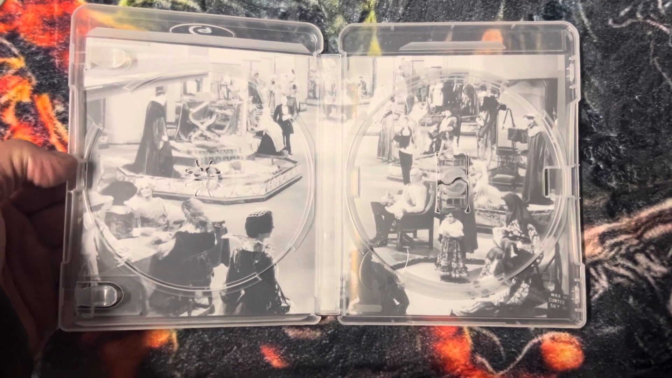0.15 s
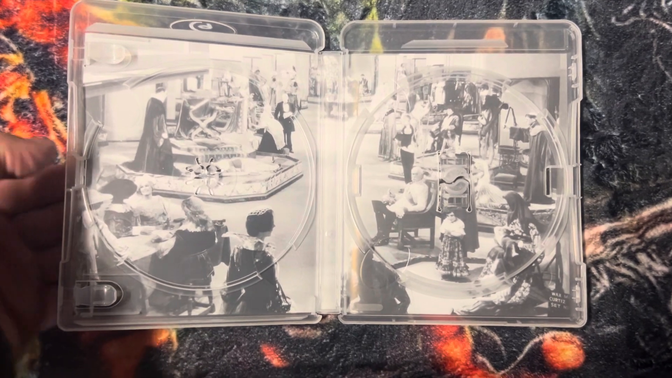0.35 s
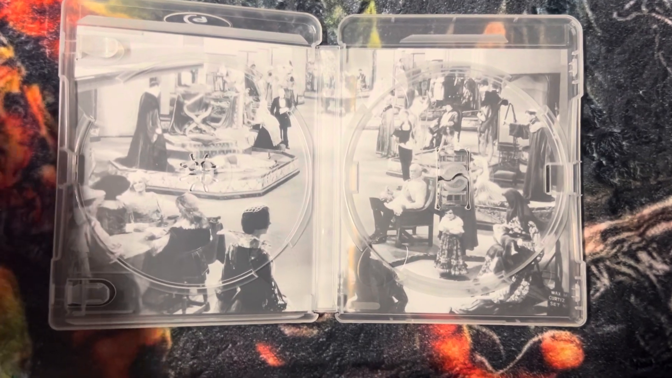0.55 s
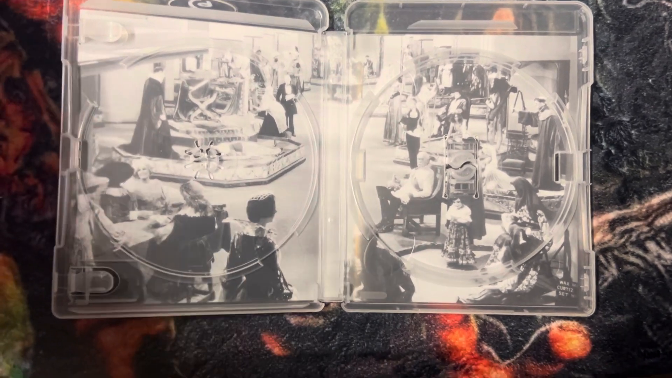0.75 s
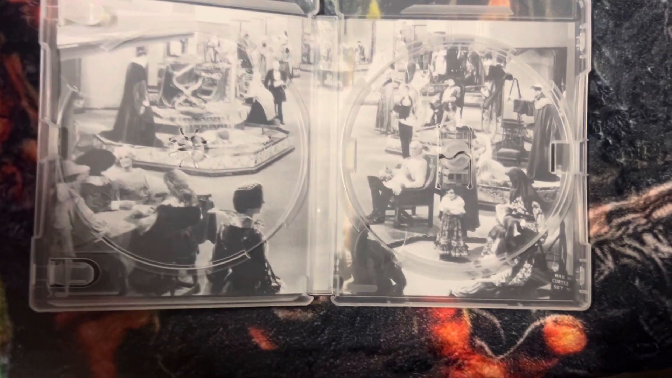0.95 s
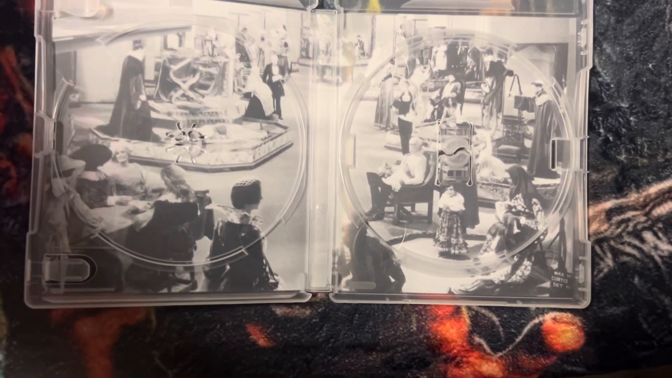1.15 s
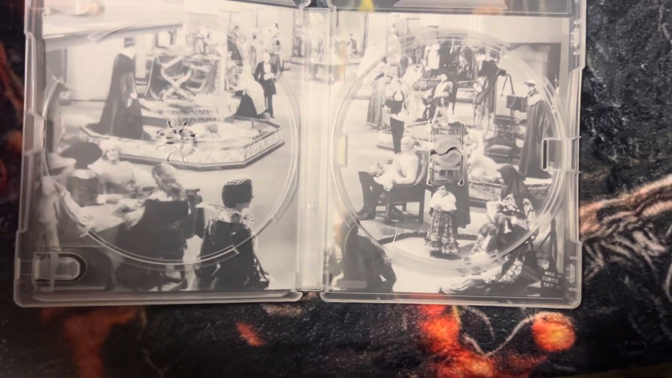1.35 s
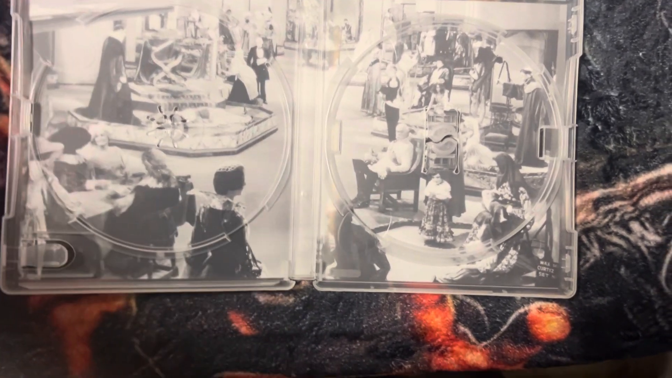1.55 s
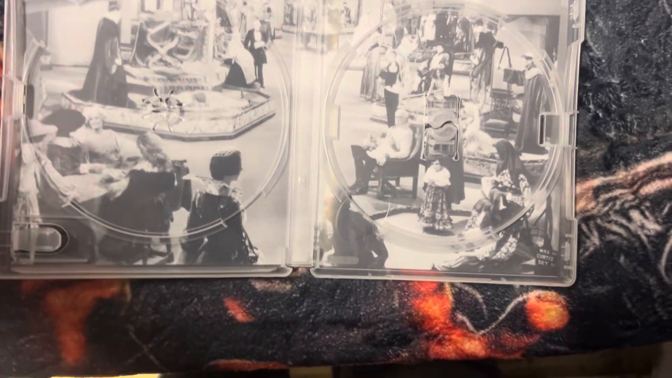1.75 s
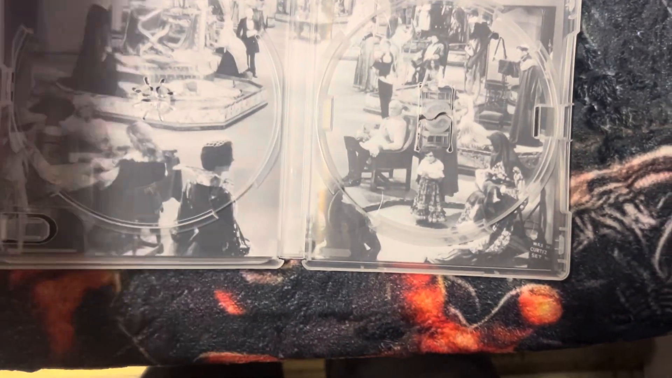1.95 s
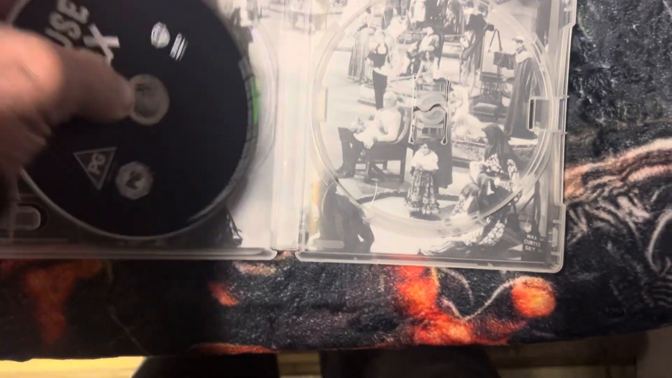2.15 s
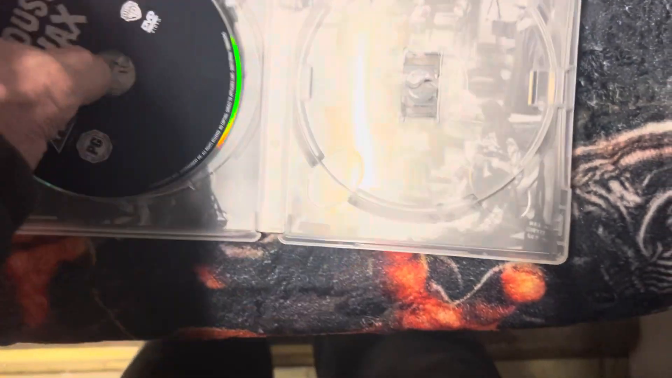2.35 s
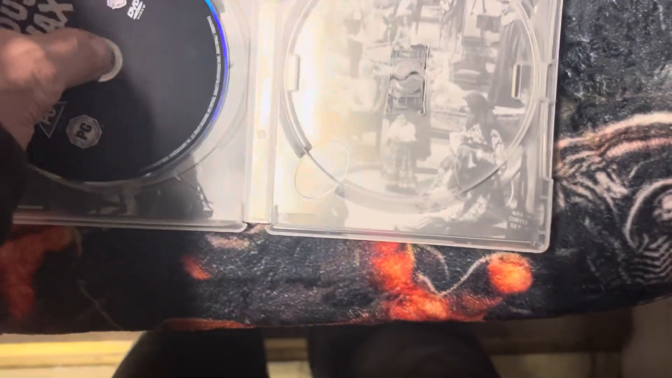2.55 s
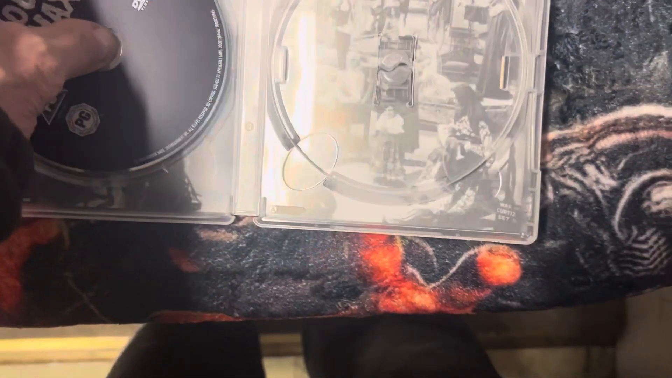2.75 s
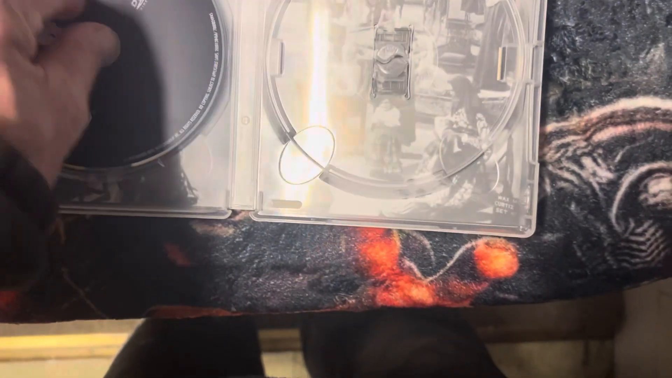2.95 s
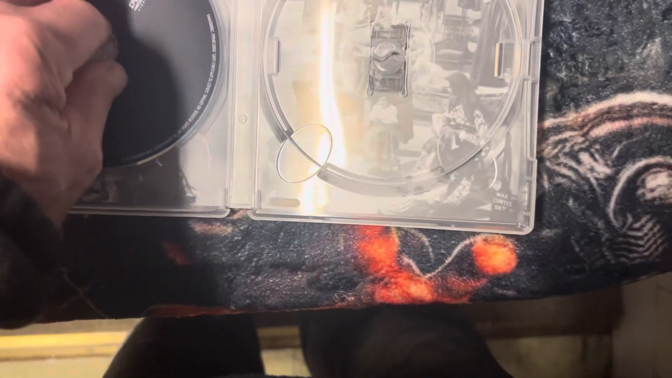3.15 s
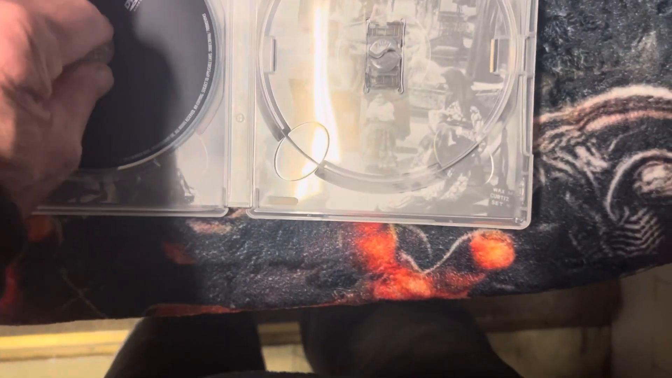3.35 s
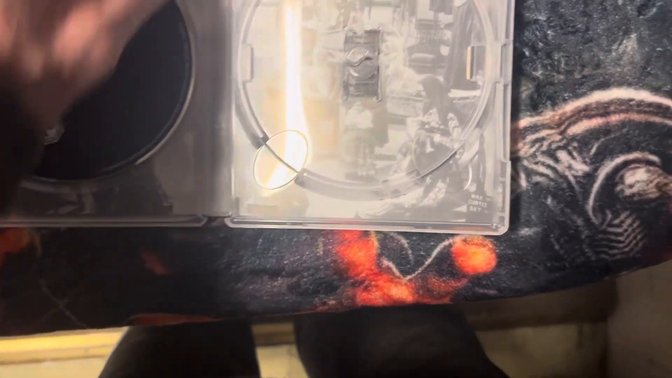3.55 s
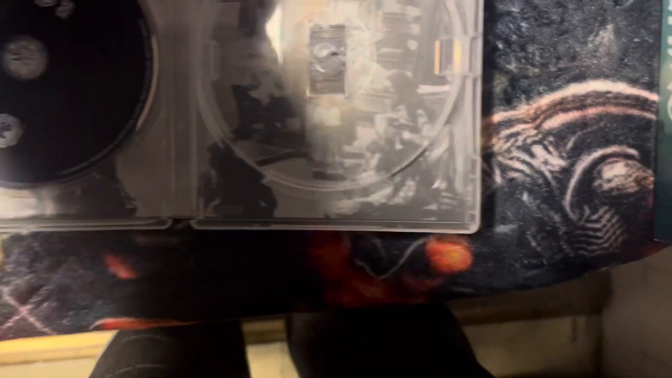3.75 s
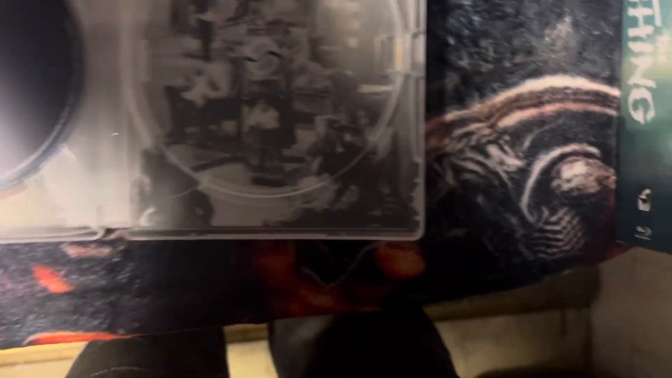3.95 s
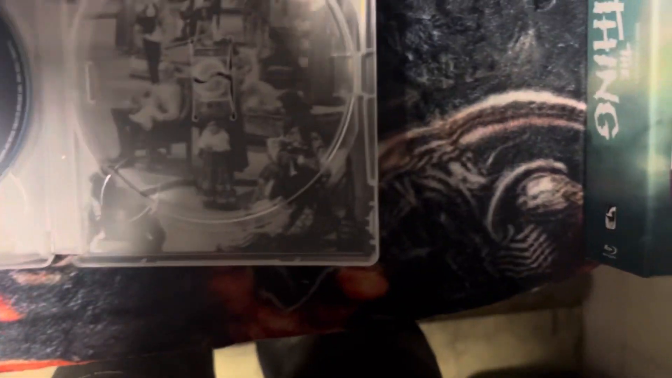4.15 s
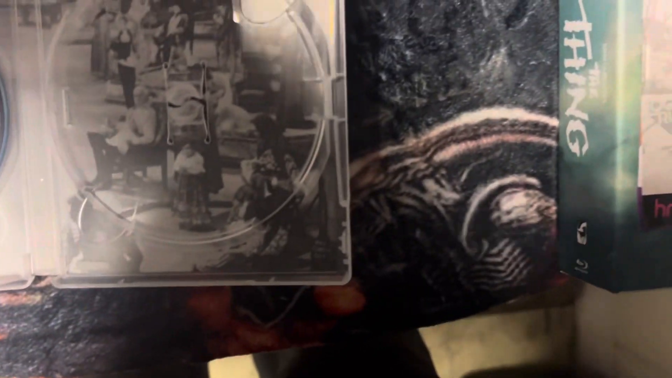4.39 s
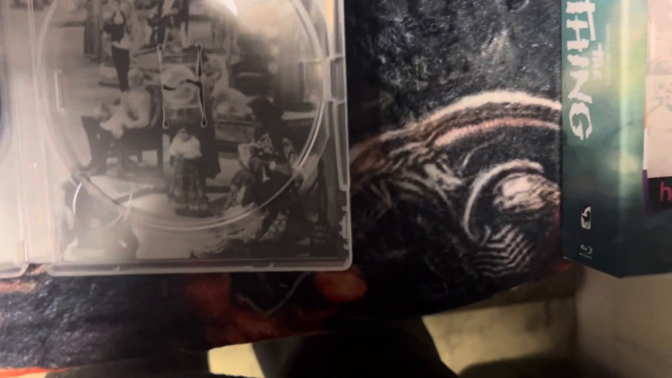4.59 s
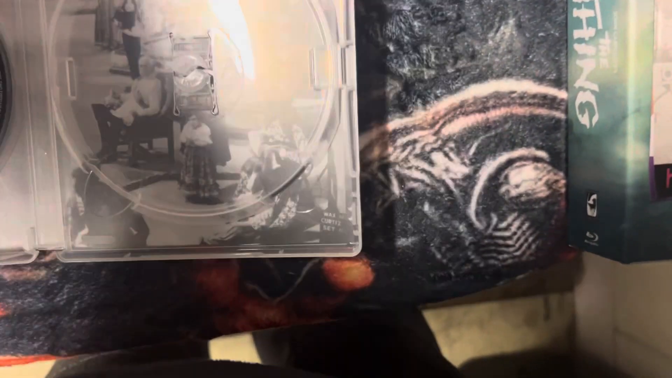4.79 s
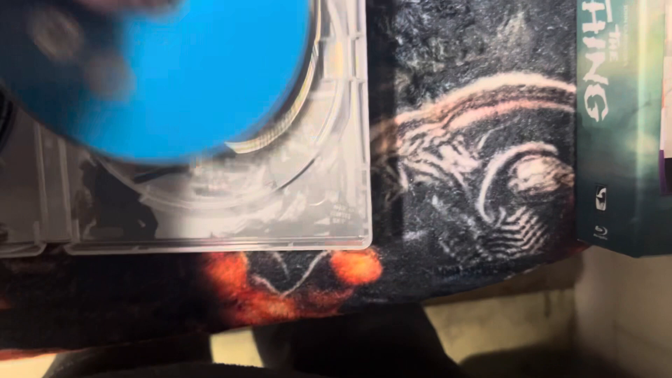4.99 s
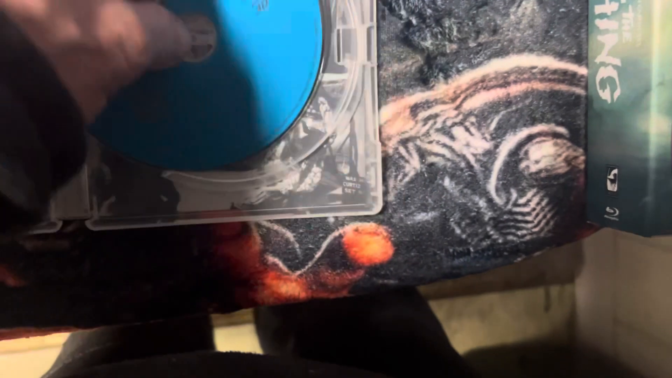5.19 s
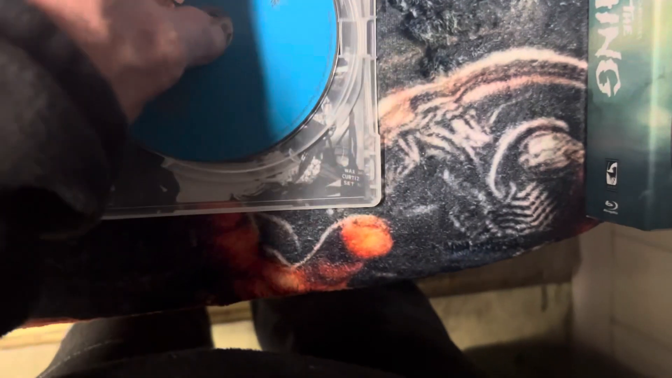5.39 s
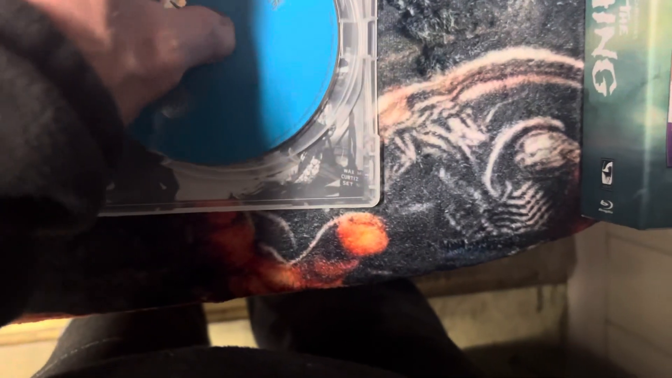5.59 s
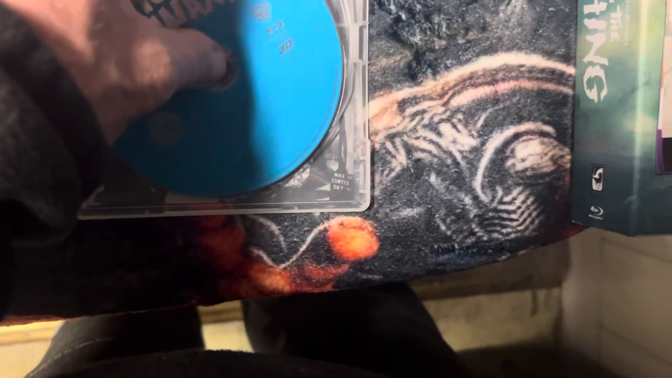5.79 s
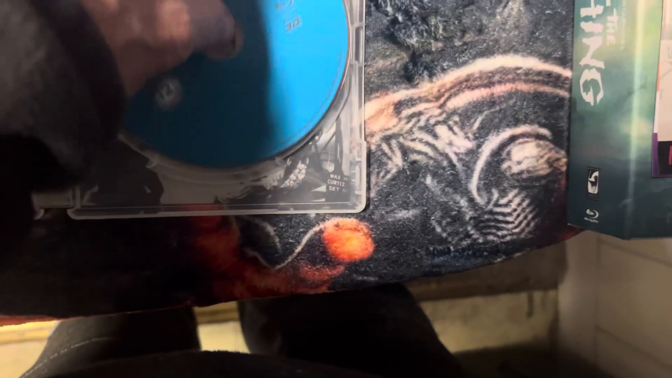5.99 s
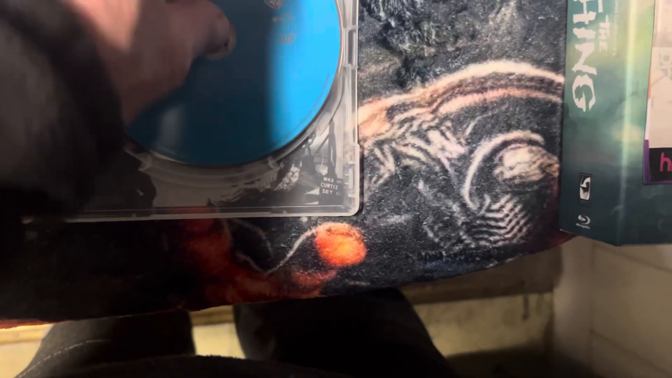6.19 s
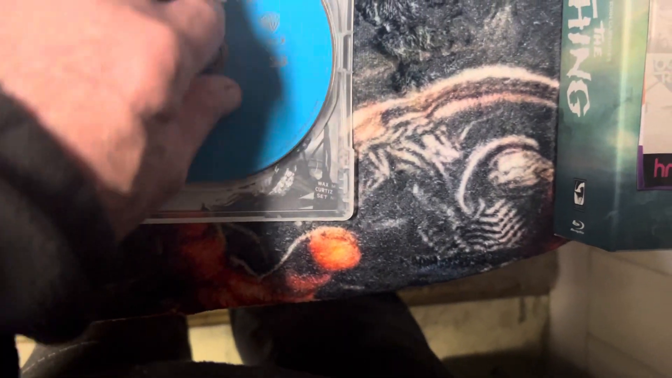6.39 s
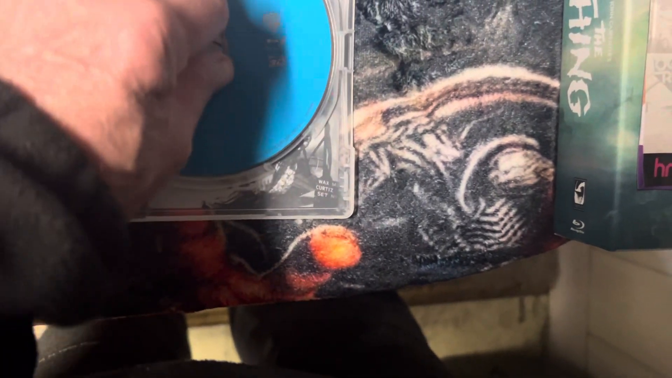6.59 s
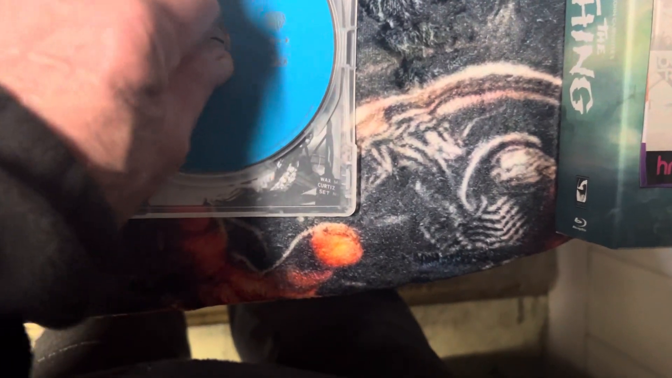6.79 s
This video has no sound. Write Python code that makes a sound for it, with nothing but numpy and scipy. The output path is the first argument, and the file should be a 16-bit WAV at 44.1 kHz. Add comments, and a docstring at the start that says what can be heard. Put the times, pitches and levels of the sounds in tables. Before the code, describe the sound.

Close handling of a hollow plastic disc case on a blanket in a small quiet room. Faint rubbing and tiny ticks come first, then a loud double clack as a disc lands, lighter rattles and a bright snap. After a quiet pause a second disc clatters down, is shifted and tapped, and finally snaps home loudest of all. Hand-held phone, near and dry.

```python
"""Two discs are laid on the hubs of an open plastic case on a blanket, shifted about, pressed until they snap home.
Each contact is a few ms of grainy force ringing tray, disc and rim; scrapes are longer, swelling forces.
Pushes thud as low decaying sines; skin and sleeve rubbing, and the rattle after hard contacts, are swells of noise.
Behind: a faint wall tail, air noise and lumpy rumble. A hand-held phone with two microphone ports listens close by."""
import sys
import numpy as np
from scipy import signal
from scipy.fft import rfft, irfft, next_fast_len
from scipy.io import wavfile
from scipy.ndimage import uniform_filter1d

SR = 44100
rng = np.random.default_rng(int(sys.argv[2]) if len(sys.argv) > 2 else 0)


def dump(signal):
    """Clip the signal to [-1, 1] and save it as 16-bit WAV at the path in sys.argv[1]."""
    limited = np.clip(np.atleast_2d(signal).T, -1, 1)
    pcm = np.round(limited * 32767).astype(np.int16)
    wavfile.write(sys.argv[1], SR, pcm)


def volts(x):
    """Linear amplitude factor 10**(x/20) for a level x in dB, scalar or array-like."""
    e = np.asarray(x, float) / 20
    return 10 ** e


N = 301369  # samples


def unit(x):
    """Scaled to rms 1."""
    return x / np.sqrt(np.mean(x ** 2) + 1e-20)


def along(points, hz, column=1):
    """One column of a table read on a log frequency axis."""
    rows = np.transpose(points)
    return np.interp(np.log(hz + 1), np.log(rows[0] + 1), rows[column])


def over_time(points):
    """Second column of a (time, value) table, one value per sample."""
    time_s, value = np.transpose(points)
    return np.interp(np.arange(N) / SR, time_s, value)


def wobble(knots_per_s):
    """Random curve, straight between normally distributed knots."""
    knots = rng.standard_normal(int(N * knots_per_s / SR) + 2)
    return np.interp(np.arange(N) * knots_per_s / SR, np.arange(len(knots)), knots)


def filtered(x, response):
    """x times a complex response of frequency."""
    size = next_fast_len(N + 8192)
    hz = np.fft.rfftfreq(size, 1 / SR)
    return irfft(rfft(x, size) * response(hz), size)[..., :N]


def ringing(x, modes, spread_db=0, near_hz=None):
    """x through parallel resonances, spread_db random in strength; those near near_hz, if given, ring most."""
    mode_hz, width_hz, level_db = np.transpose(modes)[:, :, None]
    level_db = level_db + spread_db * rng.standard_normal(mode_hz.shape)
    if near_hz:
        level_db = level_db - 11 * np.log2(mode_hz / near_hz) ** 2
    sign = (-1.) ** np.arange(len(modes))[:, None]
    size = next_fast_len(x.shape[-1] + 1024)
    f = np.fft.rfftfreq(size, 1 / SR)

    def resonance(width):
        return 1j * f * width / (mode_hz ** 2 - f ** 2 + 1j * f * width)

    # a weaker, narrower part of each mode lingers
    response = resonance(width_hz) + 0.25 * resonance(0.2 * width_hz)
    total = (sign * volts(level_db) * response).sum(0)
    return irfft(rfft(x, size) * total, size)[..., :x.shape[-1]]


# likeness of diffuse sound at the two ports: (frequency [Hz], likeness [0-1])
PORT_LIKENESS = [(60, 1), (300, .75), (900, 0.2), (1600, 0.05), (2400, 0.8), (3700, 0.03), (4600, 0.99),
                 (5500, 0), (6600, .95), (16000, .95)]


def diffuse(spectrum):
    """Two-port noise of rms 1; the mid/side balance sets how alike the ports are."""
    def mid_side(hz):
        angle = np.arccos(np.clip(along(PORT_LIKENESS, hz), 0, 1)) / 2
        return volts(along(spectrum, hz)) * np.array([np.cos(angle), np.sin(angle)])

    mid, side = filtered(rng.standard_normal((2, N)), mid_side)
    return unit(np.array([mid + side, mid - side]))


def patchy(x, depth_db):
    """Random patches of gain over time and frequency, rescaled to rms 1."""
    z = signal.stft(x, nperseg=256)[2]
    field = rng.standard_normal(z.shape[1:])
    field = uniform_filter1d(uniform_filter1d(field, size=4, axis=0), size=9, axis=1)
    return unit(signal.istft(z * volts(depth_db * unit(field)), nperseg=256)[1][:, :N])


# resonances of the hollow trays: (frequency [Hz], width [Hz], relative level [dB])
TRAY_1_MODES = [(291, 220, 1.5), (403, 120, 3), (520, 85, -3), (650, 110, 0.5), (770, 110, -2),
                (990, 120, 2), (1226, 150, 1), (1462, 130, 0), (1634, 80, 1), (1849, 120, -0.5)]
TRAY_2_MODES = [(315, 300, 11), (392, 100, 9.5), (561, 120, -0.5), (660, 107, 0), (751, 140, 0.5),
                (930, 110, 0), (1101, 130, 1), (1198, 110, 1.5), (1350, 140, 0), (1660, 200, -1.5),
                (1871, 140, 5.5)]
# resonances of each disc and its clips: (frequency [Hz], width [Hz], relative level [dB])
DISC_1_MODES = [(2090, 160, -6.5), (2590, 83, -2.5), (2650, 420, 2), (3360, 150, 6.5), (3686, 400, -0.5),
                (4030, 460, -1), (4278, 270, 0), (5240, 1100, -6.5), (5365, 210, -5), (6200, 240, -5),
                (7480, 2500, -7), (9000, 820, -3)]
DISC_2_MODES = [(2060, 160, 7.5), (2417, 130, -1.5), (2753, 380, -2.5), (3135, 330, 3), (3450, 510, 0),
                (4070, 490, 2), (4560, 300, 0.5), (4964, 360, -3.5), (5680, 710, -6.5), (6410, 810, -3.5),
                (8700, 1900, -4), (9570, 400, -9)]
# resonances of the rim: (frequency [Hz], width [Hz], relative level [dB])
RIM_MODES = [(9400, 370, -3), (10600, 1900, -1.5), (12600, 990, -1.5), (13100, 580, -6),
             (14500, 4200, -16.5)]
SECOND_DISC_S = 4.0  # touches from here on ring the second tray and disc


def plastic(rows, shape, grain_db, first_blow):
    """Grainy force drives tray, disc and rim; each level is the rms over the touch."""
    out = np.zeros(N + SR)
    for start_s, length_s, tray_db, tray_hz, disc_db, rim_db in rows:
        t = np.arange(3072 if length_s < 0.02 else 5120) / SR
        first = start_s < SECOND_DISC_S
        tray_modes = TRAY_1_MODES if first else TRAY_2_MODES
        disc_modes = DISC_1_MODES if first else DISC_2_MODES
        soft, hard = shape(t, length_s)
        rough, grains = rng.standard_normal((2, len(t)))
        force = rough * volts(grain_db * unit(uniform_filter1d(grains, size=20)))
        # the landing itself is one clean push
        push = force * soft + first_blow * np.exp(-t / 0.00018)
        # the wide tray cannot follow fast force
        dull = signal.lfilter(*signal.butter(4, 2300, fs=SR), push)
        parts = [(tray_db, ringing(dull, tray_modes, spread_db=2.5, near_hz=tray_hz)),
                 (disc_db, ringing(force * hard, disc_modes, spread_db=3.5)),
                 (rim_db, ringing(force * hard, RIM_MODES, spread_db=6.0))]
        touch = t < length_s + 0.001
        for level_db, ring in parts:
            out[round(start_s * SR):][:len(t)] += volts(level_db) * ring / np.std(ring[touch])
    return out[:N]


# contacts of disc, hub and tray:
# (time [s], length [s], tray level [dB], disc level [dB], rim level [dB])
CONTACTS = [(0.152, 0.018, -64, -89, -100), (0.1805, 0.01, -57, -92, -99), (.8165, .005, -70, -72, -84.5),
            (1.357, 0.00293, -67, -55.5, -70), (2.0427, 0.0048, -66, -60.5, -64.5),
            (2.1626, 0.0081, -16, -33.5, -33.5), (2.1815, .0078, -22.5, -38, -50.5),
            (2.2462, 0.0058, -38.5, -49.5, -56.5), (2.2713, .002, -32.5, -42.5, -45),
            (2.3468, 0.00074, -46, -49.5, -73), (2.3816, .0025, -59, -74.5, -75),
            (2.4691, 0.0037, -52.5, -58, -56), (2.6257, 0.0079, -33.5, -34, -39.5),
            (2.6413, .008, -40, -47, -59.5), (2.7317, 0.0055, -67, -55.5, -69),
            (2.7529, .0058, -44, -44, -52), (2.767, .0064, -43, -58.5, -68.5),
            (2.896, .005, -49.5, -52.5, -59.5), (2.9164, .0081, -36, -41, -46.5),
            (2.928, 0.0077, -42.5, -54, -51.5), (3.0058, 0.0073, -22, -21.5, -19.5),
            (3.4133, 0.0051, -72, -67.5, -56), (3.8548, 0.0064, -62.5, -68.5, -84),
            (4.2778, 0.0051, -50, -59.5, -65.5), (4.5506, 0.0065, -58, -69, -75),
            (5.0296, .0078, -22.5, -34.5, -40.5), (5.0453, .0049, -26.5, -34, -42),
            (5.054, .0077, -38, -48.5, -53.5), (5.1922, .0017, -39, -43.5, -53),
            (5.2597, .006, -48.5, -61, -77), (5.27, .0077, -42, -45.5, -61.5),
            (5.2777, .0033, -59, -58.5, -59), (5.2993, 0.009, -57, -70.5, -71),
            (5.3179, 0.0024, -40.5, -41.5, -61.5), (5.3675, 0.0029, -50, -55.5, -72.5),
            (5.3804, 0.0064, -49, -62.5, -86), (5.5281, 0.00384, -44.5, -55, -70),
            (5.602, 0.0031, -55, -80, -91.5), (5.622, .0025, -51.5, -68, -73.5),
            (5.6588, 0.0026, -31.5, -30.5, -29), (5.6671, 0.0045, -29.5, -36, -54.5),
            (5.692, .0017, -47, -42.5, -59), (5.7143, .005, -38, -44, -50.5),
            (5.8564, 0.0023, -43, -46.5, -56.5), (5.8726, 0.003, -34.5, -75.5, -79.5),
            (5.9793, 0.0054, -60, -58, -66.5), (5.993, .012, -42, -48.5, -51.5),
            (6.1002, 0.0089, -26, -33.5, -41), (6.112, .008, -39.5, -43, -46.5),
            (6.119, 0.0055, -35.5, -51, -69.5), (6.132, .0073, -38.5, -44.5, -53.5),
            (6.2104, .0076, -51.5, -60, -69), (6.2196, 0.006, -47, -57, -61.5),
            (6.2291, .0079, -55, -53.5, -67), (6.2707, .007, -22.5, -27.5, -31.5),
            (6.276, .0064, -24, -25.5, -38.5), (6.295, 0.0092, -40.5, -54, -62),
            (6.381, 0.0045, -31, -39.5, -44), (6.4193, 0.0078, -55, -56.5, -57),
            (6.4413, .0019, -33, -43, -73), (6.4764, 0.0057, -36.5, -54.5, -70),
            (6.5197, 0.0075, -14, -18, -23), (6.7047, .005, -74, -69.5, -78.5),
            (6.7153, .0019, -49, -80, -95), (6.7336, 0.00246, -41, -76, -73.5)]
# tray centre pitch at 0 dB, its rise per dB of blow, and per dB that the tray outweighs the disc
STRUCK_HZ, STRUCK_HZ_PER_DB, PADDED_HZ_PER_DB = 1000, 2.5, 5


def contacts():
    """A contact chatters for a few ms; its first hard touch is the strongest and brightest."""
    def shape(t, length_s):
        release_s = np.maximum(t - 0.64 * length_s, 0)
        held = (1 - np.exp(-t / 0.0001)) * volts(-60 * release_s / 0.004)
        return held, held * (volts(-9 * t / length_s) + 2.1 * np.exp(-t / 0.00068))

    rows = []
    for start_s, length_s, tray_db, disc_db, rim_db in CONTACTS:
        excess_db = min(tray_db - disc_db, 22)
        tray_hz = STRUCK_HZ + STRUCK_HZ_PER_DB * tray_db + PADDED_HZ_PER_DB * excess_db
        rows.append((start_s, length_s, tray_db, tray_hz, disc_db, rim_db))
    return plastic(rows, shape, grain_db=1.5, first_blow=4.1)


# short scrapes of the disc over ribs and clips:
# (time [s], length [s], tray level [dB], tray pitch [Hz], disc level [dB])
SCRAPES = [(.36, .068, -76, 770, -75.5), (.47, .042, -77, 930, -66), (1.33, .059, -67, 850, -70.5),
           (1.44, .043, -61, 870, -64), (1.55, .09, -76, 760, -69.5), (2.015, .073, -67, 710, -65),
           (2.147, .02, -43.5, 1080, -68.5), (2.225, .04, -44.5, 1030, -57), (2.26, .021, -45.5, 1030, -52),
           (2.29, .037, -53.5, 990, -65.5), (2.447, .021, -44, 660, -49.5), (2.58, .053, -48.5, 810, -59),
           (2.685, .04, -58, 875, -62.5), (2.885, .012, -55.5, 860, -59.5), (2.905, .0098, -60, 970, -53),
           (2.95, .039, -65, 770, -57.5), (3.14, .07, -62.5, 946, -67), (4.13, .03, -70.5, 805, -75),
           (4.31, .038, -69, 760, -67.5), (4.432, .032, -60, 500, -61.5), (5.815, .0088, -56.5, 816, -72),
           (5.9, .07, -57.5, 760, -72.5), (6.0, .0204, -57.5, 734, -67), (6.08, .014, -58, 1270, -65),
           (6.14, .0266, -48, 600, -59.5), (6.262, .0098, -27.5, 850, -45), (6.506, .016, -37, 1000, -45)]
SCRAPED_RIM_DB = -3  # rim over disc


def scrapes():
    """A scrape is grainy force that swells and fades, with no first blow."""
    def shape(t, length_s):
        swell = np.sin(np.pi * np.minimum(t / (1.15 * length_s), 1)) ** 1.3
        return swell, swell

    rows = [row + (row[-1] + SCRAPED_RIM_DB,) for row in SCRAPES]
    return plastic(rows, shape, grain_db=3, first_blow=0)


# faint hollow tone: (time [s], frequency [Hz], level [dB], t60 [s])
HOLLOW_TONE = (1.455, 985, -52, .3)


def hollow():
    """One short, slightly unsteady sine fading away."""
    start_s, hz, level_db, t60_s = HOLLOW_TONE
    t = np.maximum(np.arange(N) / SR - start_s, 0)
    attack = np.minimum(t / 0.004, 1)
    flutter = volts(2.0 * wobble(97))
    return volts(level_db - 60 * t / t60_s) * attack * flutter * np.sin(2 * np.pi * hz * t)


# the case pushed into the blanket:
# (time [s], level before lift and slow start [dB], pitch [Hz], t60 [s])
THUDS = [(1.614, -33, 79, 0.085), (2.17, -26, 72.4, 0.066), (2.19, -22.5, 97.5, 0.066),
         (2.92, -36.5, 89.3, 0.13), (3.011, -32, 73.1, 0.12), (4.556, -37.5, 215.6, 0.085),
         (5.029, -37, 80.7, 0.15), (6.282, -33, 77, 0.17), (6.521, -27, 233, 0.039),
         (6.543, -34.5, 61.8, 0.13)]
THUD_LIFT_DB = 0.5


def thuds():
    """A soft push: a few low cycles with a slow start."""
    out, t = np.zeros(N + SR), np.arange(SR // 5) / SR
    for start_s, level_db, hz, t60_s in THUDS:
        decay = volts(level_db + THUD_LIFT_DB - 60 * t / t60_s)
        attack = 1 - np.exp(-t / 0.0045)
        out[round(start_s * SR):][:len(t)] += decay * attack * np.sin(2 * np.pi * hz * t)
    return out[:N]


# swells of handling noise: skin and sleeve rubbing, and the rattle trailing after hard contacts:
# (middle [s], length [s], hiss level [dB], tray rumble level [dB])
HANDLING_SWELLS = [(0.175, 0.24, -92, -71.5), (0.381, 0.21, -71.5, -69), (0.51, 0.24, -73, -74),
                   (0.624, .2, -79.5, -72), (0.746, 0.28, -74, -67.5), (.93, .3, -86.5, -69),
                   (1.05, 0.13, -79.5, -82), (1.187, 0.21, -80, -78), (1.361, 0.18, -66, -64),
                   (1.47, .18, -71, -61.5), (1.585, 0.078, -75.5, -73), (1.708, .2, -76, -66.5),
                   (1.864, 0.31, -65.5, -70), (2.016, .15, -70, -69), (2.249, .16, -59, -46),
                   (2.417, 0.34, -71.5, -62), (2.618, .15, -57.5, -50), (2.743, .2, -76.5, -66),
                   (3.0, 0.34, -65.5, -54.5), (3.177, 0.26, -71, -66), (3.329, .3, -89.5, -76.5),
                   (3.49, 0.29, -79, -78.5), (3.748, 0.47, -68.5, -65.5), (4.018, 0.34, -89, -84),
                   (4.201, .22, -77.5, -73), (4.38, 0.37, -69, -63), (4.588, 0.28, -73.5, -67.5),
                   (4.8, 0.32, -64, -67), (5.088, 0.26, -68, -58.5), (5.259, 0.24, -64, -56),
                   (5.409, .16, -68, -63), (5.545, .22, -75.5, -77.5), (5.694, .15, -60.5, -52.5),
                   (5.961, 0.22, -66.5, -57), (6.146, .18, -66, -56.5), (6.306, 0.2, -60.5, -48),
                   (6.533, .12, -55, -39.5), (6.607, .2, -65, -57.5), (6.802, 0.21, -85, -71)]
# spectrum of the hiss: (frequency [Hz], relative density [dB])
HISS_SPECTRUM = [(900, -90), (1400, -33.5), (2000, 1), (3000, -0.5), (4500, -4.5), (6500, -8), (9000, -19),
                 (13000, -63)]
# spectrum of the treble sheen: (frequency [Hz], relative density [dB])
SHEEN_SPECTRUM = [(4000, -58.5), (6000, -12), (8500, -3.5), (12000, -1.5), (14300, -5), (15500, -18.5),
                  (16500, -61)]
RESTING_HISS_DB, RESTING_TRAY_DB = -94, -80  # the hand never lies quite still
SHEEN_DB, SHEEN_EXPONENT = -77, 0.92  # sheen at median hiss; it swings less than the hiss
SWELL_SHARPNESS = 1.2  # how pointed a swell is


def handling_noise():
    """Rubbing, and rattle after hard contacts: uneven hiss, sheen and tray noise that swell and fade."""
    middle_s, length_s, hiss_db, tray_db = np.transpose(HANDLING_SWELLS)[:, :, None]
    knots = np.arange(0, N, 64)
    swell = np.exp(-abs(4 * (knots / SR - middle_s) / length_s) ** SWELL_SHARPNESS)

    def gain(swell_db, rest_db):
        return np.interp(np.arange(N), knots, volts(rest_db) + (volts(swell_db) * swell).sum(0))

    hiss_gain = gain(hiss_db, RESTING_HISS_DB)
    sheen_gain = volts(SHEEN_DB) * (hiss_gain / np.median(hiss_gain)) ** SHEEN_EXPONENT
    hiss = hiss_gain * patchy(diffuse(HISS_SPECTRUM), depth_db=0.5)
    sheen = sheen_gain * patchy(diffuse(SHEEN_SPECTRUM), depth_db=0.0)
    shaking = diffuse([(300, 1.5), (1900, 0), (2600, -29), (5000, -91)])
    tray = patchy(ringing(shaking, TRAY_1_MODES), depth_db=2.5)
    unevenness_db = 1.6 * wobble(45) + 1.6 * wobble(250)
    return volts(unevenness_db) * (hiss + sheen + gain(tray_db, RESTING_TRAY_DB) * tray)


# decay of the room: (frequency [Hz], t60 [s])
WALL_DECAY = [(200, 0.22), (1000, 0.089), (3000, 0.14), (12000, 0.016)]


def walls(x):
    """The room holds the energy of each band and lets it die as fresh noise."""
    hz, t, z = signal.stft(x, SR, nperseg=256, noverlap=192)
    keep = volts(-120 * (t[1] - t[0]) / along(WALL_DECAY, hz))  # acts on power
    energy = np.array([signal.lfilter([0, 1 - k], [1, -k], abs(row) ** 2) for k, row in zip(keep, z)])
    noise = signal.stft(diffuse([(20, 0)]), nperseg=256, noverlap=192)[2]
    noise = noise / np.sqrt(np.mean(abs(noise) ** 2))
    return signal.istft(noise * np.sqrt(energy), nperseg=256, noverlap=192)[1][:, :N]


# room rumble: (time [s], level before lift [dB])
RUMBLE_LEVEL = [(0, -63), (.2, -58), (.6, -61.5), (1.08, -64.5), (1.7, -60.5), (2.04, -66.5), (2.26, -60),
                (2.57, -64.5), (3.0, -59), (3.4, -67), (3.9, -63), (4.28, -63.5), (4.55, -57.5),
                (4.9, -66.5), (5.15, -60.5), (5.65, -59), (5.95, -62.5), (6.4, -58.5), (6.83, -58)]
# deepest rumble, from the hand on the phone: (time [s], level [dB])
GRIP_LEVEL = [(0, -61), (.93, -53), (1.3, -61), (2.0, -62), (2.26, -61), (2.7, -63), (3.6, -65.5),
              (4.25, -64.5), (4.5, -61.5), (4.9, -75.5), (5.2, -69), (6.0, -66.5), (6.45, -54.5),
              (6.83, -61)]
# noise spectra: (frequency [Hz], relative density [dB])
AIR_SPECTRUM = [(60, -90.5), (120, -33), (220, -3), (400, 0), (700, -3), (1100, -4.5), (1700, -12.5),
                (2200, -29), (4000, -90.5)]
RUMBLE_SPECTRUM = [(25, -90), (45, -32.5), (60, 1), (86, 1.5), (120, -6), (210, -12), (300, -16),
                   (400, -44), (700, -120)]
GRIP_SPECTRUM = [(15, -90), (28, -29.5), (40, -2), (52, 0), (66, -24), (110, -120)]
AIR_DB, RUMBLE_LIFT_DB = -72.0, 3.5


def room_tone():
    """Nearly steady air noise over low rumble noise that comes in lumps."""
    rumble_db = over_time(RUMBLE_LEVEL) + RUMBLE_LIFT_DB + 2.2 * wobble(11)
    grip_db = over_time(GRIP_LEVEL) + 1.8 * wobble(6.4)
    air = volts(AIR_DB + 0.63 * wobble(2.7)) * diffuse(AIR_SPECTRUM)
    return air + volts(rumble_db) * diffuse(RUMBLE_SPECTRUM) + volts(grip_db) * diffuse(GRIP_SPECTRUM)


def scene():
    """Handling close to the phone, in a small quiet room."""
    near = contacts() + scrapes() + hollow()
    return near + thuds() + handling_noise() + volts(-11.0) * walls(near) + room_tone()


def low_pass(x):
    """Removes everything above the highest recorded frequency."""
    return signal.sosfilt(signal.butter(12, 16790, fs=SR, output="sos"), x)


# how the ports differ: (frequency [Hz], left lead [rad], left over right [dB])
PORT_DIFFERENCE = [(60, 0.4, -0.7), (298, 0.33, 0.5), (1000, 0.64, -1), (1420, 1.9, -2), (1920, 1.5, 3.5),
                   (3000, -1.1, 4.5), (4400, -0.9, -0.5), (5600, 1.3, 6), (6400, 0.011, 0.8)]


def record(dry):
    """Ports differ in level and phase; deepest bass is cut, loudest peaks rounded off."""
    def ports(hz):
        # in the treble the left port lags like a longer path
        lead_rad = along(PORT_DIFFERENCE, hz) - 2 * np.pi * np.maximum(hz - 6800, 0) / 6150
        half = volts(along(PORT_DIFFERENCE, hz, column=2) / 2) * np.exp(0.5j * lead_rad)
        bass_cut = (1j * hz / (30 + 1j * hz)) ** 2
        return np.array([half, 1 / half]) * bass_cut

    heard = filtered(dry, ports)
    heard = heard / (1 + abs(heard / 0.85) ** 6) ** (1 / 6)
    return low_pass(heard)


dry = scene()
out = record(dry)
dump(out)
```